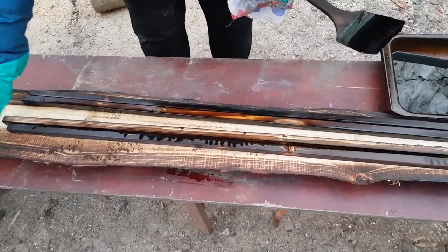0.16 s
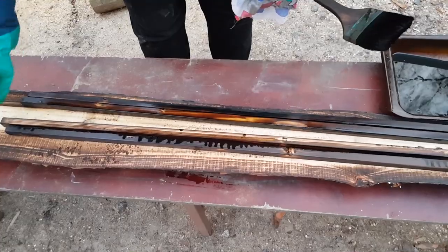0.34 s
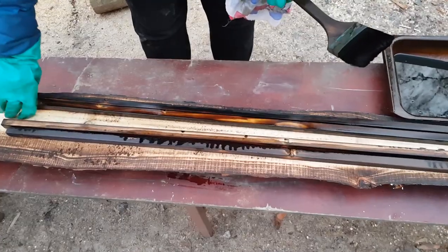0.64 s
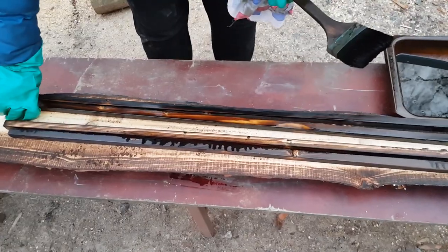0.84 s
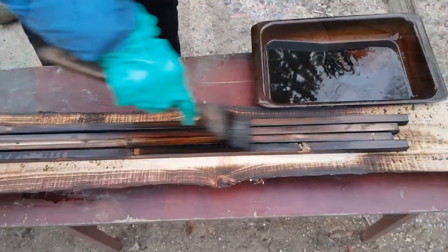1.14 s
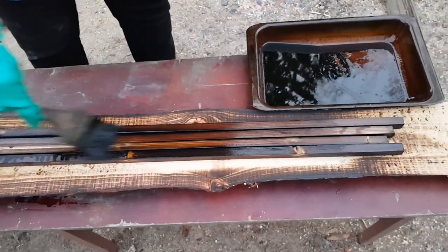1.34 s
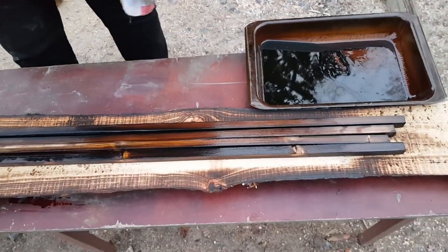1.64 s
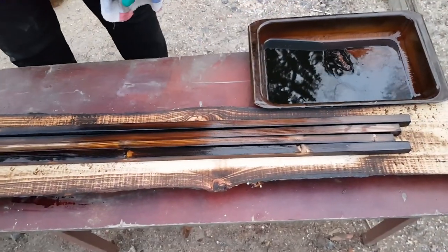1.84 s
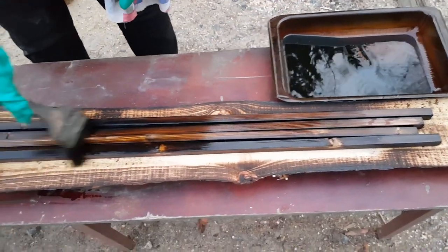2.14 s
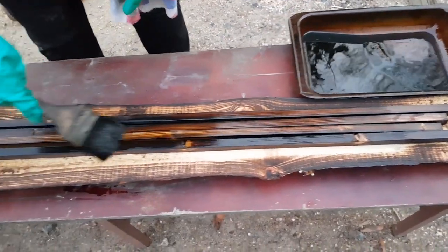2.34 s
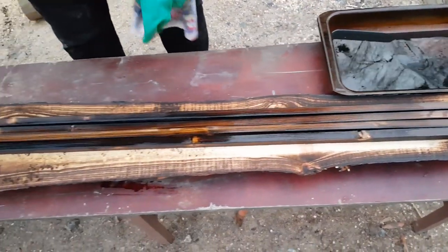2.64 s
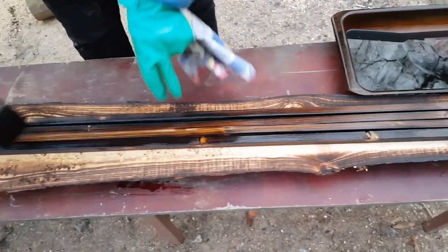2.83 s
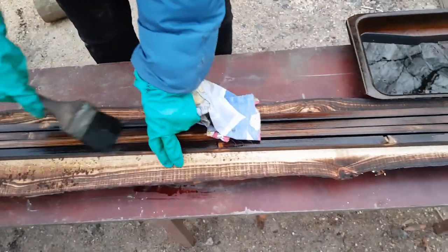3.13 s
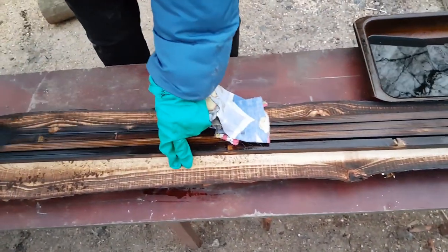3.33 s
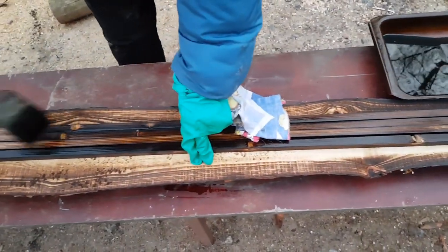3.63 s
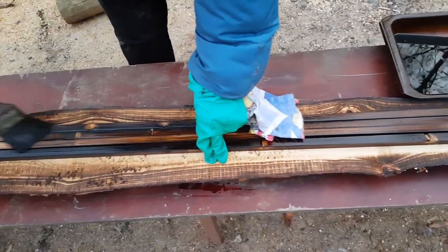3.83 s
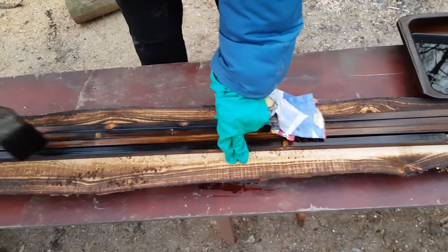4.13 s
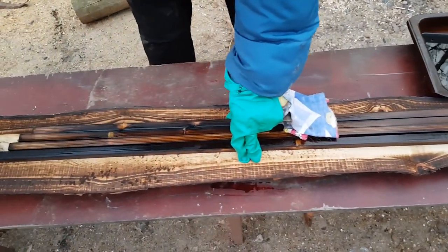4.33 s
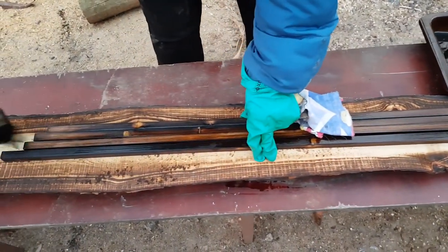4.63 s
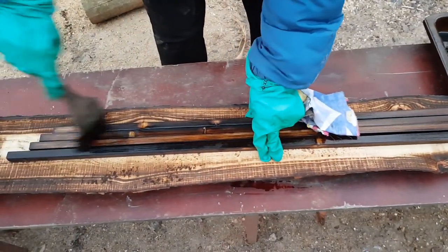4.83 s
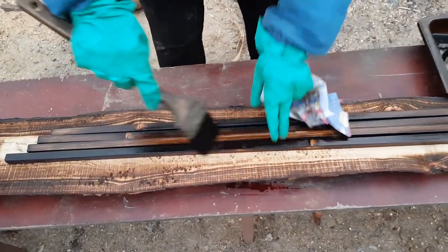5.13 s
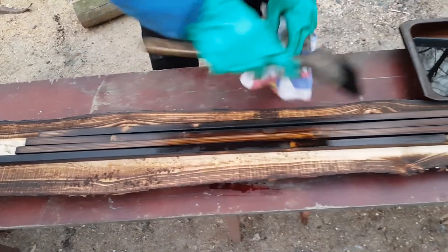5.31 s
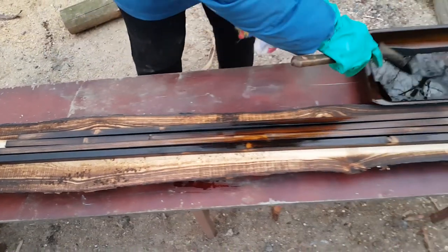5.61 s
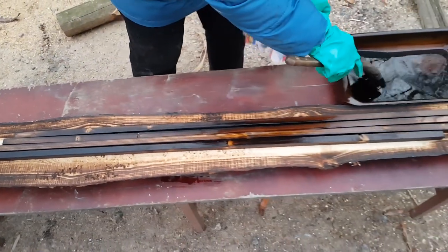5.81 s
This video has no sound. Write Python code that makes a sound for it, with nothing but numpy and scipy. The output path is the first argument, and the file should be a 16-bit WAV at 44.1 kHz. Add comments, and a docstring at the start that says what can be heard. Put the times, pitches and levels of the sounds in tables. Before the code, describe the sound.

A close, dry outdoor sound of about six seconds: a wide brush working oil along wooden strips on a table. Wind pushes at the microphone as low, lumpy rumble from the start, over faint air hiss and a weak wavering low hum. A light double knock comes at 0.1 s, with soft sleeve rustle and small scuffs. At 0.8 s a strip lands with a loud, sharp clack that rings briefly. Three long strokes follow, at about 1.0-1.7, 1.8-2.3 and 2.3-2.8 s, bristle hiss over a grainy rasp, the first and third swelling; wind is calmer here. A short low drone marks pressure near 2.65 s. Five shorter, drier strokes start near 3.1, 3.7, 4.2, 4.5 and 4.8 s, with faint knocks among them. Wind gusts return, with a dull thump at 4.3 s. Small knocks at 5.0 and 5.5 s, muffled bumps and faint scuffs end it.

```python
"""Oiling charred wood outdoors

Oil is wiped along charred wooden strips on a table, with a wide brush and a rag in hand.
Three long strokes and five short ones are shaped noise: a hiss in the bristles over a rasp in the wood.
A strip set down with a ringing clack, and smaller knocks, are clicks that set decaying tones going.
Wet scuffs are short bits of rough noise in one resonance, and sleeves and rag rustle as duller noise.
Wind buffets the microphone as low, lumpy noise, and a far hum wavers as a very narrow band of noise."""
import sys
import numpy as np
from scipy import signal
from scipy.fft import rfft, irfft, next_fast_len
from scipy.io import wavfile
from scipy.ndimage import uniform_filter1d

SR = 44100
rng = np.random.default_rng(int(sys.argv[2]) if len(sys.argv) > 2 else 0)


def digitize_waveform(pressure):
    """Quantize a signal to 16-bit integers and store it at the path in sys.argv[1].

    Rows of a 2-D input are taken as channels; values are limited to [-1, 1].
    """
    field = np.atleast_2d(pressure).T
    bounded = np.clip(field, -1, 1)
    quanta = np.round(bounded * 32767).astype(np.int16)
    wavfile.write(sys.argv[1], SR, quanta)


N = 263096  # length in samples, about 6 s

# Levels are relative: the sources weigh them again when they are mixed.
# Decay t60 is the time in which a plain fade drops by 60 dB.

# Open air, dull and even, over faint microphone hiss: f/Hz, level per Hz/dB
AIR_SPECTRUM = [(150, -3), (400, -4.5), (650, -8.5), (900, -8), (1400, -17), (2200, -21), (3600, -27.5),
                (7000, -37), (11000, -25), (15700, -20.5)]
AIR_DB = -70.5
# Loudness of the far hum: t/s, level/dB
HUM_LEVEL = [(0, -51), (1.2, -63.5), (1.8, -76.5), (2.6, -54), (3.5, -56), (5.97, -60.5)]
HUM_HZ, HUM_WIDTH_HZ = 74.22, 2.24  # width of each of the two filter passes
# Loudness of sleeves and rag: t/s, level/dB
RUSTLE_LEVEL = [(0, -63), (0.12, -59), (0.2, -74), (0.55, -76.5), (0.95, -63.5), (1.8, -70.5), (3.05, -63),
                (3.55, -81.5), (4.75, -73), (5.05, -66.5), (5.5, -66.5), (5.97, -84.5)]
# Colour of sleeves and rag: f/Hz, level per Hz/dB
CLOTH_SPECTRUM = [(350, -12), (600, 1), (757, -9.5), (955, -1), (1160, -4.5), (1940, -6), (2850, -16),
                  (6460, -8.5), (8380, -13), (15700, -19.5)]

# Loudness of wind on the microphone: t/s, rumble level/dB, flutter level/dB
WIND_LEVEL = [(0, -50.5, -90), (0.1, -40, -50.5), (0.22, -50.5, -65.5), (0.3, -39, -67), (0.6, -57.5, -72),
              (0.7, -37.5, -66), (0.78, -55.5, -64), (0.88, -42, -54.5), (1.01, -48, -69),
              (1.18, -43.5, -70), (1.25, -63.5, -82.5), (1.9, -72.5, -82.5), (2.55, -62.5, -78.5),
              (2.92, -42.5, -67), (3.08, -57, -72), (3.34, -48.5, -71.5), (3.5, -60.5, -79),
              (3.72, -45, -66), (3.99, -41, -61.5), (4.09, -55.5, -79), (4.21, -38, -60), (4.34, -38, -54),
              (4.42, -51, -70), (4.87, -47, -66.5), (5.01, -39.5, -54.5), (5.33, -37.5, -62.5),
              (5.78, -58, -69), (5.97, -48.5, -70.5)]
# Colour of the low wind rumble: f/Hz, level per Hz/dB
RUMBLE_SPECTRUM = [(13, -53), (22, -10), (47, 1), (67, 2.5), (82, 0.5), (113, -20.5), (145, -16.5),
                   (160, -31.5), (210, -66), (350, -120)]
# Colour of the wind flutter above it: f/Hz, level per Hz/dB
FLUTTER_SPECTRUM = [(53, -16), (90, -5.5), (113, -9.5), (151, -14), (311, -27.5), (500, -32.5),
                    (650, -71.5), (1100, -120)]
# Dull buffets on the microphone: t/s, level/dB, length/s
BUFFETS = [(0.687, -36.5, 0.002), (2.748, -30.5, 0.0022), (4.32, -19.5, 0.0014), (5.043, -35, 0.0015),
           (5.163, -27.5, 0.0024), (5.209, -30, 0.0024)]

# Scuffs and swishes of bristles, glove and sleeve: t/s, length/s, level/dB, f/Hz, width/Hz
SCUFF_EVENTS = [(0.0, 0.11, -64, 1910, 1400), (0.064, 0.01, -55.5, 6370, 2200),
                (0.083, 0.06, -59.5, 4700, 4000), (0.371, 0.11, -74, 7000, 1500),
                (0.629, 0.33, -62.5, 4880, 1100), (0.67, 0.2, -61, 5770, 2170),
                (0.936, 0.044, -56, 5660, 5060), (0.947, 0.11, -65, 4650, 700),
                (0.934, 0.053, -55, 1800, 700), (1.329, 0.009, -45.5, 7000, 7000),
                (1.63, 0.029, -47, 4640, 1800), (1.675, 0.24, -69, 1680, 500),
                (2.2, 0.29, -67.5, 1820, 706), (3.095, 0.06, -63.5, 4600, 1100),
                (3.709, .03, -58, 4700, 1400), (4.152, 0.027, -72.5, 6550, 1200),
                (4.53, 0.014, -62, 5100, 3000), (4.56, 0.11, -72, 4350, 500),
                (4.614, 0.27, -72.5, 1700, 450), (4.99, 0.0059, -55, 4350, 1400),
                (4.994, 0.036, -59.5, 3900, 1900), (5.01, 0.097, -68, 3950, 1000),
                (5.074, 0.67, -72.5, 7000, 1900), (5.286, 0.37, -76, 2460, 600)]

# Wood knocks on wood: t/s, clack level/dB, clack pitch f/Hz, free ring level/dB,
# table thud level/dB, tick level/dB
KNOCK_EVENTS = [(0.0916, -32.5, 855, -83, -45.5, -56), (0.098, -31, 857, -62, -38, -63),
                (0.7987, -13, 715, -23.5, -40, -40.5), (0.964, -37, 715, -77, -56.5, -59),
                (3.118, -45.5, 1120, -59, -56.5, -56), (3.264, -47, 1100, -79, -62, -64),
                (3.955, -52.5, 1070, -68, -60, -48), (4.429, -63, 1090, -80, -62, -59.5),
                (5.0095, -43, 796, -65, -46, -57), (5.5364, -42, 850, -62, -59.5, -72)]
# Damped clack of strip against table: multiple of the clack pitch, level/dB, decay t60/s
CLACK_TONES = [(.49, -24.5, 0.043), (1.001, -6, 0.017), (1.3, -20.5, 0.012), (1.67, -18.5, 0.0053)]
# The strip ringing freely: f/Hz, level/dB, decay t60/s
STRIP_TONES = [(194, -16, 0.27), (296, -12, 0.17), (371, -15, 0.22), (544, -17, 0.16), (619, -12, 0.17),
               (705, -17, 0.18), (775, -18, 0.18), (894, 0, 0.16), (1039, -12, 0.21), (1077, -17, 0.22),
               (1254, -8, 0.28), (1303, -16.5, .74), (1448, -14, 0.12), (1518, -8, 0.19), (1610, -40, 0.77),
               (1771, -23, 0.24), (1927, -31, 0.25), (2175, -23, 0.15), (2519, -28, 0.27)]
# The table top when struck: f/Hz, level/dB, decay t60/s
TABLE_TONES = [(165.5, -1.5, 0.15), (187.6, 1, 0.21), (265.6, -2.5, 0.23)]

# Strokes of the brush: start t/s, attack/s, hold/s, release/s, level at the end of the hold/dB,
# swell over the hold/dB, rasp over hiss/dB
BRUSH_STROKES = [ (0.986, 0.11, 0.47, 0.18, -48, 11, 2.5), (1.841, 0.083, 0.2, .18, -52.5, -2.5, 0),
                 (2.332, 0.078, 0.2, .16, -47, 7.4, 1), (3.118, 0.23, .043, .098, -47.5, 0, -0.6),
                 (3.707, 0.015, 0.17, 0.096, -49, 10.5, 1.2), (4.197, .019, 0.047, 0.13, -48.5, 12, 0),
                 (4.526, 0.011, 0.076, 0.083, -53.5, 11.1, -1), (4.787, 0.081, 0.017, 0.11, -50.5, 2, -1), ]
# Bristle hiss: f/Hz, level per Hz/dB
HISS_SPECTRUM = [(4120, -10.5), (7000, -3.5), (8660, -4), (11500, -4), (15100, -4), (15700, -4)]
# Wood rasp under a long stroke: f/Hz, level per Hz/dB
LONG_RASP_SPECTRUM = [(410, -60), (700, -0.5), (960, -11), (1290, -6.5), (1530, 2), (2350, 2), (2950, 0),
                      (3230, 1.5), (3880, -4.5), (4170, -3.5), (5010, 4), (6800, 6), (8000, 1),
                      (10400, -66), (17600, -120)]
# Wood rasp under a short stroke: f/Hz, level per Hz/dB
SHORT_RASP_SPECTRUM = [(410, -26), (700, -12.5), (931, -4.5), (1130, -8.5), (1250, -7), (1940, 0),
                       (2770, -9), (3160, -2), (3470, -5), (3650, 0), (3920, -3.5), (4520, 3), (5660, -5),
                       (7220, -1), (8000, -13), (10400, -51), (17600, -120)]
# Resonances of the strips under a long stroke: f/Hz, width/Hz, lift/dB
STRIP_RESONANCES = [(966, 210, 13.5), (1620, 100, 1.5), (1983, 57, 9.5), (2310, 79, 9.5), (2850, 47, 6),
                    (3215, 150, 7.5), (3685, 330, 12), (4180, 390, 11), (4650, 120, 7), (6600, 250, 0.5)]
# The table droning where the hand bears down: t/s, level/dB
BEARING_LEVEL = [(2.48, -90), (2.63, -51.5), (2.70, -52.5), (2.74, -83)]
# Colour of that drone: f/Hz, level per Hz/dB
DRONE_SPECTRUM = [(88, -46), (150, -23), (221, 0.5), (391, -20), (432, -18), (551, -26), (805, -10),
                  (881, -15.5), (1300, -24.5), (1690, -54), (2860, -120)]
# Table top and arm mirroring the brush: average extra delay/s, strength (fraction)
MIRROR_PATHS = [(.0007, .28), (.0021, .24)]
PATH_SWING = .12  # spread of the slow delay changes, as a natural logarithm
# Before this the strokes are long; after it a hand holds the strips down and damps them
HELD_FROM_S = 3.0
# A stroke's flanks are bell-shaped, and this far down at its start and end
FLANK_DB = 20
# Bending bristles ring higher with effort: pitch at a reference rasp level, and its rise
BRISTLE_HZ, BRISTLE_AT_DB, BRISTLE_HZ_PER_DB = 2400, -46.5, 38
BRISTLE_WIDTH_HZ = 1300  # width of each of the two filter passes

# The microphone's port dips a band of the treble; depth is the share of a full notch
PORT_DIP_HZ, PORT_DIP_WIDTH_HZ, PORT_DIP_DEPTH = 8600, 3150, 0.59
CUTOFF_HZ = 15800


def from_db(db):
    """Turn decibels into gain."""
    return 10 ** (np.asarray(db) / 20)


def rms_one(x):
    """Scale a sound to an average strength (rms) of 1."""
    return x / np.sqrt(np.mean(x ** 2) + 1e-20)


def gain_curve(rows, axis=1):
    """Join a table's dB column by straight lines and turn it into gain, near silent outside its span."""
    rows = np.array(rows)
    db = np.interp(np.arange(N) / SR, rows[:, 0], rows[:, axis], left=-150, right=-150)
    return from_db(db)


def butter(x, hz, kind, order=2):
    """Keep the lows ("low") or the highs ("high") of a sound."""
    hz = np.clip(hz, 10, .45 * SR)
    return signal.sosfilt(signal.butter(order, hz, kind, fs=SR, output="sos"), x + 1e-18)


def colour(x, spectrum, peaks=()):
    """Filter a sound with a spectrum that falls steeply outside the table, plus resonant lifts; rms 1."""
    size = next_fast_len(N)
    hz = np.maximum(np.fft.rfftfreq(size, 1 / SR), 1)
    at, level = np.transpose(spectrum)
    octaves_outside = np.abs(np.log2(hz / np.clip(hz, at.min(), at.max())))
    db = np.interp(np.log(hz), np.log(at), level) - 48 * octaves_outside
    for centre, width, lift in peaks:
        db = db + lift / (1 + (2 * (hz - centre) / width) ** 2)
    return rms_one(irfft(rfft(x, size) * from_db(db), size)[:N])


def white():
    """Plain noise, equally strong at all frequencies."""
    return rng.standard_normal(N)


def drift(rate):
    """Wander by chance: random points, rate per second, with spread 1, joined by straight lines."""
    knots = rng.standard_normal(4096)
    return np.interp(np.arange(N) / SR * rate, np.arange(len(knots)), knots)


def steadied(x, seconds):
    """Even out the slow swells of a noise by dividing by its running strength."""
    power = uniform_filter1d(x ** 2, max(int(seconds * SR), 2))
    return x / np.sqrt(power + 1e-3)


def resonate(x, hz, width_hz):
    """Pass a sound through one resonance twice, which darkens the sound around it; rms 1."""
    r = np.exp(-np.pi * width_hz / SR)
    section = [1 - r, 0, r - 1, 1, -2 * r * np.cos(2 * np.pi * hz / SR), r * r]
    return rms_one(signal.sosfilt([section, section], x))


def ring(clicks, hz, t60):
    """Let each click start a fading sine, of starting height 1 for a unit click."""
    r = np.exp(-np.log(1000) / (t60 * SR))
    w = 2 * np.pi * hz / SR
    return signal.lfilter([0, np.sin(w)], [1, -2 * r * np.cos(w), r * r], clicks + 1e-18)


def swell_ring(hz, t60):
    """A ring that takes a moment to build up, as under a yielding blow; its envelope peaks at 1."""
    age = np.arange(int(3 * t60 * SR)) / SR
    decays = age * np.log(1000) / t60
    return decays * np.exp(1 - decays) * np.sin(2 * np.pi * hz * age)


def dying(hits, t60):
    """An envelope that jumps at each hit and fades."""
    return signal.lfilter([1], [1, -np.exp(-np.log(1000) / (t60 * SR))], hits + 1e-18)


def clicks_at(times, db):
    """Single-sample clicks of given heights."""
    out = np.zeros(N)
    out[np.round(np.atleast_1d(times) * SR).astype(int)] = from_db(db)
    return out


def add(out, s, sound):
    """Mix a short sound in at a given time."""
    part = out[int(s * SR):int(s * SR) + len(sound)]
    part += sound[:len(part)]


def friction(slips_per_s, slip_db, rough_db):
    """Steady noise of sliding fibres plus random snaps, both shaken by the grain and bumps of a surface."""
    slips = (rng.random(N) < slips_per_s / SR) * white()
    unevenness = drift(260) + .5 * drift(35)
    return (white() + from_db(slip_db) * rms_one(slips)) * from_db(rough_db * unevenness)


def open_air():
    """Even, dull noise of the open air over faint microphone hiss."""
    return from_db(AIR_DB) * colour(white(), AIR_SPECTRUM)


def far_hum():
    """A very narrow band of noise, which sounds like a wavering tone."""
    return steadied(resonate(white(), HUM_HZ, HUM_WIDTH_HZ), 0.11) * gain_curve(HUM_LEVEL)


def cloth_rustle():
    """Fibres of sleeves and rag sliding and snapping, louder and softer over time."""
    rub = friction(slips_per_s=590, slip_db=-23.0, rough_db=1.04)
    return colour(rub, CLOTH_SPECTRUM) * gain_curve(RUSTLE_LEVEL)


def wind(rumble_db=-1.0, flutter_db=6, port_hz=36):
    """Eddies at the microphone: a lumpy rumble, with flutter above it in the gusts."""
    rumble = butter(colour(white(), RUMBLE_SPECTRUM), port_hz, "high", order=3)
    rumble = steadied(rumble, 0.061) * from_db(2.4 * drift(13))
    flutter = steadied(colour(white(), FLUTTER_SPECTRUM), 0.044) * from_db(2.0 * drift(40))
    rumble = rumble * gain_curve(WIND_LEVEL)
    flutter = flutter * gain_curve(WIND_LEVEL, axis=2)
    return from_db(rumble_db) * rumble + from_db(flutter_db) * flutter


def bumps(port_hz=45):
    """Soft pushes of pressure; the microphone passes no deep bass, so each push swings back."""
    out, t = np.zeros(N), np.arange(N) / SR
    for s, db, length in BUFFETS:
        bell = np.exp(-np.minimum(((t - s) / length) ** 2, 50))
        push = butter(bell, port_hz, "high", order=4)
        out += from_db(db) * push / np.abs(push).max()
    return out


def scuffs():
    """Short swells of stick and slip in one resonance, with a little bristle hiss on top."""
    out = np.zeros(N)
    rub = friction(slips_per_s=1000, slip_db=-6.5, rough_db=1.4)
    fizz = rms_one(butter(rub, 11000, "high", order=4))
    for s, length, db, hz, width_hz in SCUFF_EVENTS:
        span = slice(max(int(s * SR), 0), int((s + length) * SR))
        # The broader the scuff for its pitch, the more hiss goes with it
        fizz_gain = from_db(-6) * (width_hz / hz) ** 2
        voice = resonate(rub[span], hz, width_hz) + fizz_gain * fizz[span]
        out[span] += from_db(db) * voice * signal.windows.tukey(len(voice), .7)
    return out


def knocks(rebound_s=.006, spread_s=0.0044, radiation_hz=430, haze_db=-23, haze_t60=0.43,
           rattle_db=-22, rattle_t60=0.19, rattle_hz=690, rattle_width_hz=200,
           tick_t60=0.036, tick_hz=3800):
    """A strip lands with a tick and a damped clack that shakes the table, then rebounds, rings and rattles."""
    times, clack_db, pitch_hz, ring_db, thud_db, tick_db = np.transpose(KNOCK_EVENTS)
    landing = clicks_at(times, clack_db)
    push = clicks_at(times, thud_db)

    def rebound():
        # Bending waves disperse, so each tone starts at its own moment
        return clicks_at(times + rebound_s + spread_s * rng.random(), ring_db)

    clack = np.zeros(N)
    for s, level_db, hz in zip(times, clack_db, pitch_hz):
        for multiple, db, t60 in CLACK_TONES:
            add(clack, s, from_db(level_db + db) * swell_ring(multiple * hz, t60))

    thud = np.zeros(N)
    for k, (hz, db, t60) in enumerate(TABLE_TONES):
        thud += (-1) ** k * from_db(db) * ring(push, hz, t60)

    free = sum(from_db(db) * ring(rebound(), hz, t60) for hz, db, t60 in STRIP_TONES)
    # A narrow strip gives off its low tones poorly
    free = butter(free, radiation_hz, "high", order=1)
    # The many weak upper tones blur into a short haze
    haze = from_db(haze_db) * resonate(white(), 950, 640) * dying(rebound(), haze_t60)

    rattle = steadied(resonate(white(), rattle_hz, rattle_width_hz), 0.001)
    rattle = from_db(rattle_db) * rattle * dying(landing, rattle_t60)
    tick = butter(butter(white(), tick_hz, "low", order=3), 910, "high")
    tick = rms_one(tick) * dying(clicks_at(times, tick_db), tick_t60)
    return clack + thud + free + haze + rattle + tick


def strokes():
    """The brush gathers speed, travels while the hand bears down, and slows; gains of hiss and rasp."""
    t, hiss, rasp = np.arange(N) / SR, 0, 0
    for start, attack, hold, release, db, swell_db, rasp_db in BRUSH_STROKES:
        age = t - start - attack  # time since the hold began
        # 0 during the hold, 1 at the stroke's start and end
        flank = np.maximum(np.maximum(-age / attack, (age - hold) / release), 0)
        pressure_db = swell_db * (np.clip(age / hold, 0, 1) - 1)
        gain = from_db(db + pressure_db - FLANK_DB * np.minimum(flank ** 2, 10))
        hiss = hiss + gain
        rasp = rasp + from_db(rasp_db) * gain
    return hiss, rasp


def mirrored(x):
    """Near reflections with wandering delays make the colour shift along a stroke; rms 1."""
    n, travel = np.arange(N), np.exp(PATH_SWING * drift(7))
    echoes = sum(strength * np.interp(n - delay * SR * travel, n, x) for delay, strength in MIRROR_PATHS)
    return rms_one(x + echoes)


def bristle_ring(rub, effort):
    """A resonance that slides up with effort, blended from a row of fixed ones."""
    effort_db = 20 * np.log10(effort + 1e-9)
    centre = BRISTLE_HZ + BRISTLE_HZ_PER_DB * (effort_db - BRISTLE_AT_DB)
    pitches, step = np.linspace(1600, 2600, 9, retstep=True)
    centre = np.clip(centre, pitches[0], pitches[-1])
    blend = 0
    for hz in pitches:
        nearness = np.maximum(1 - abs(centre - hz) / step, 0)
        blend = blend + resonate(rub, hz, BRISTLE_WIDTH_HZ) * nearness
    return effort * blend


def brush(hiss_db=1.0, long_db=-2.5, short_db=-2.37, drone_db=-0.5, bristle_db=-12):
    """Each stroke hisses in the bristles and rasps in the wood beneath, in fine surges."""
    hiss_gain, rasp_gain = strokes()
    held = np.arange(N) / SR > HELD_FROM_S
    surge = from_db(0.57 * drift(30))

    hiss_rub = friction(slips_per_s=3700, slip_db=-15, rough_db=1.0)
    hiss = mirrored(colour(hiss_rub, HISS_SPECTRUM)) * hiss_gain
    rasp_rub = friction(slips_per_s=1100, slip_db=-16.5, rough_db=1.2)
    long_rasp = mirrored(colour(rasp_rub, LONG_RASP_SPECTRUM, STRIP_RESONANCES)) * rasp_gain * ~held
    short_rasp = mirrored(colour(rasp_rub, SHORT_RASP_SPECTRUM)) * rasp_gain * held
    bristles = bristle_ring(white(), rasp_gain * ~held)
    drone = colour(white(), DRONE_SPECTRUM) * gain_curve(BEARING_LEVEL)

    rubbing = from_db(hiss_db) * hiss + from_db(bristle_db) * bristles
    rubbing += from_db(long_db) * long_rasp + from_db(short_db) * short_rasp
    return surge * rubbing + from_db(drone_db) * drone


def scene():
    """Add all the sources into one channel, with no room echo."""
    background = open_air() + far_hum() + cloth_rustle() + wind() + bumps()
    handling = scuffs() + knocks() + brush()
    return (background + handling)[None]


def record(dry):
    """The microphone's port dips a band of the treble; the top is cut steeply."""
    notch = signal.lfilter(*signal.iirnotch(PORT_DIP_HZ, PORT_DIP_HZ / PORT_DIP_WIDTH_HZ, fs=SR), dry)
    heard = dry + PORT_DIP_DEPTH * (notch - dry)
    return signal.sosfilt(signal.ellip(12, .1, 70, CUTOFF_HZ, fs=SR, output="sos"), heard)


dry = scene()
out = record(dry)
digitize_waveform(out)
```